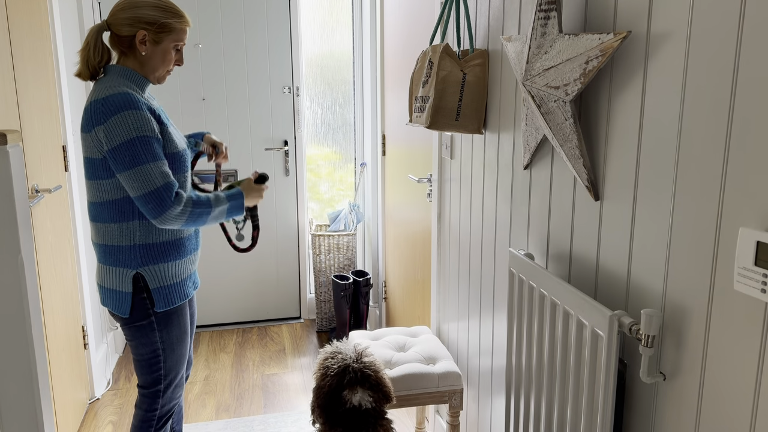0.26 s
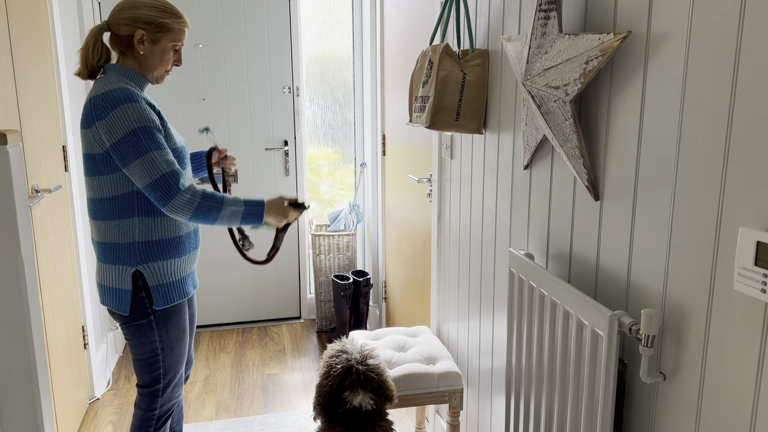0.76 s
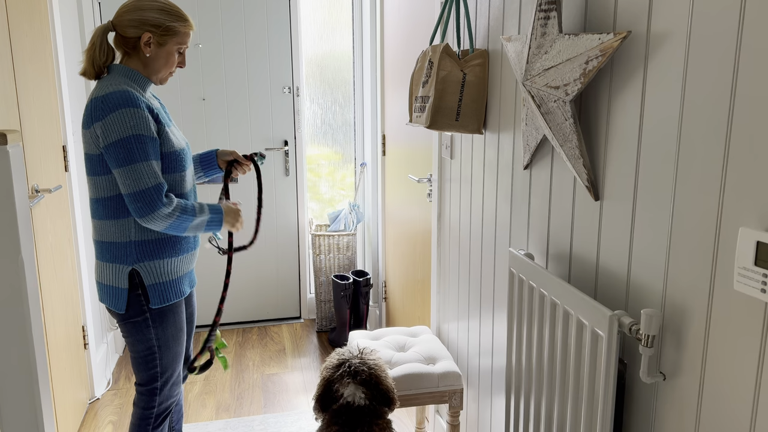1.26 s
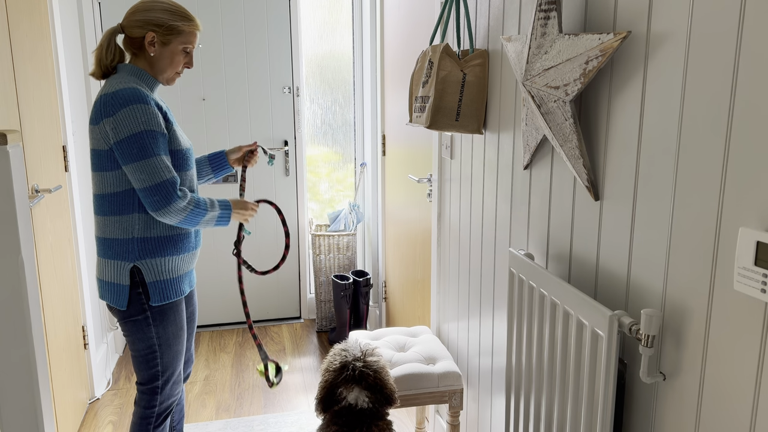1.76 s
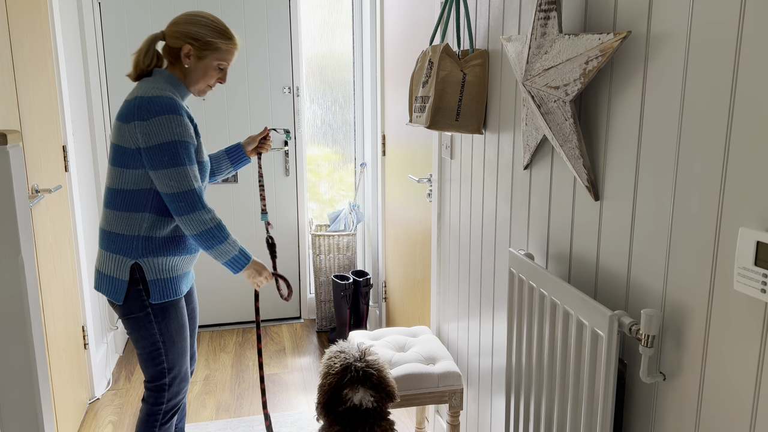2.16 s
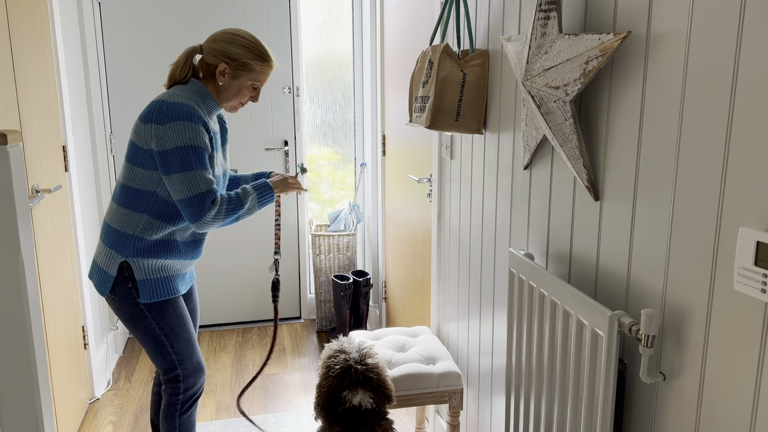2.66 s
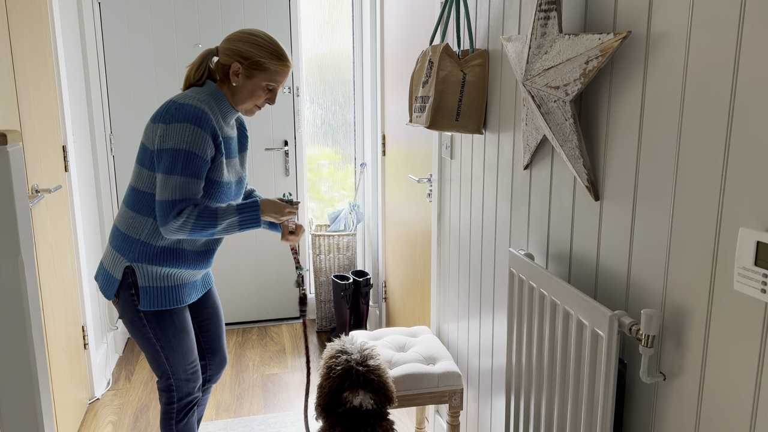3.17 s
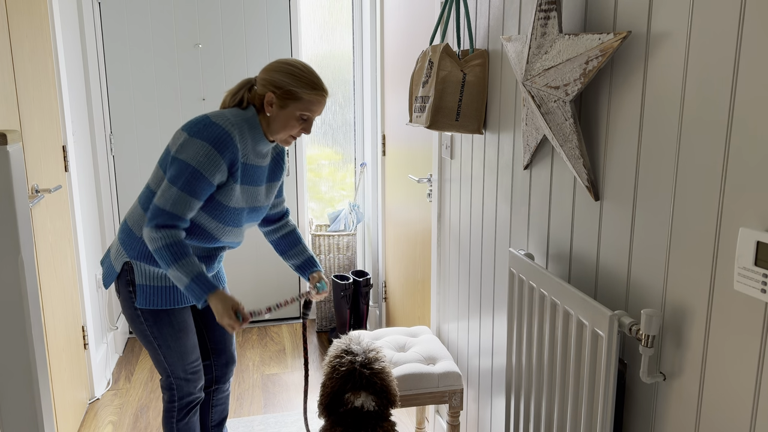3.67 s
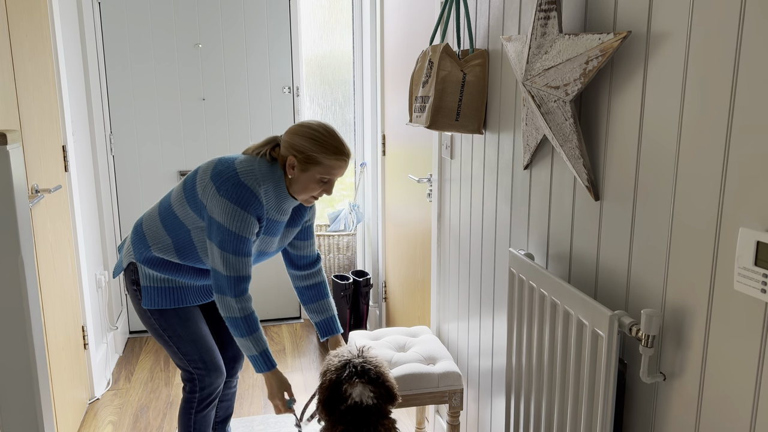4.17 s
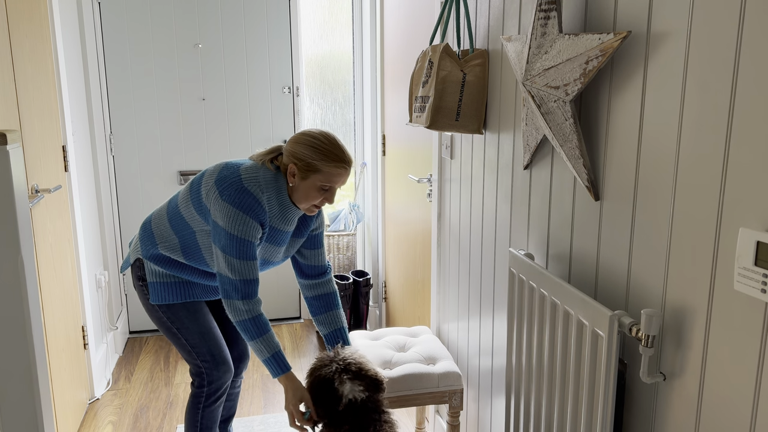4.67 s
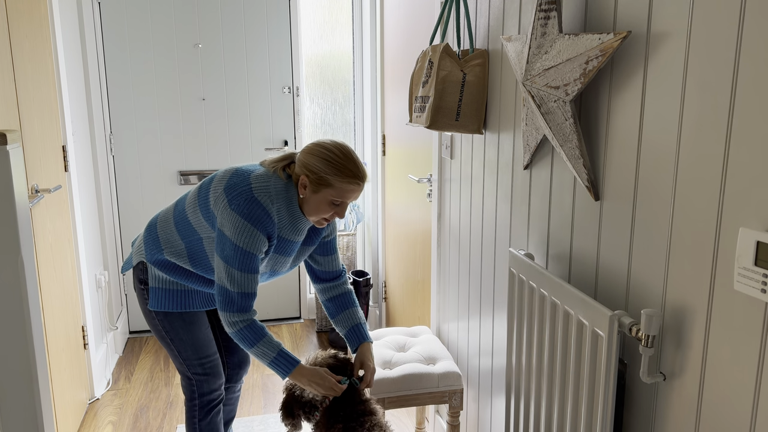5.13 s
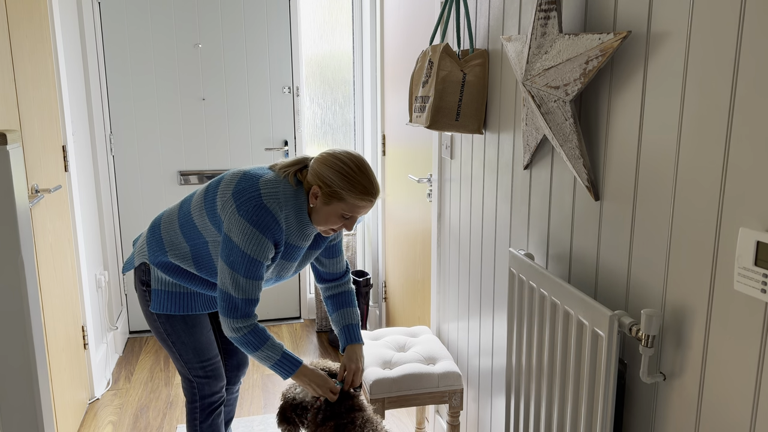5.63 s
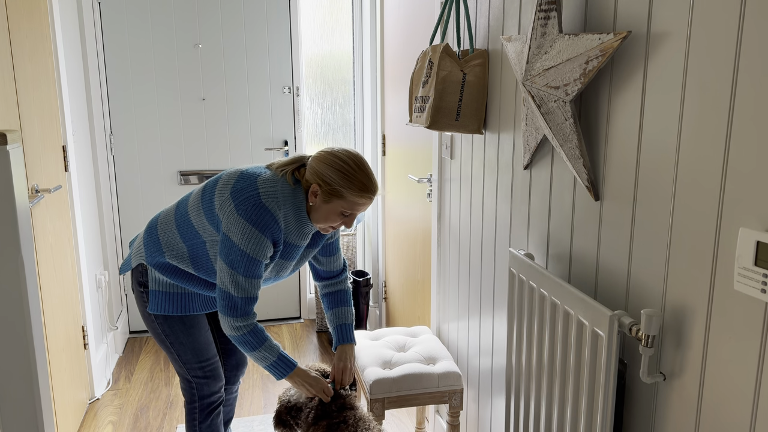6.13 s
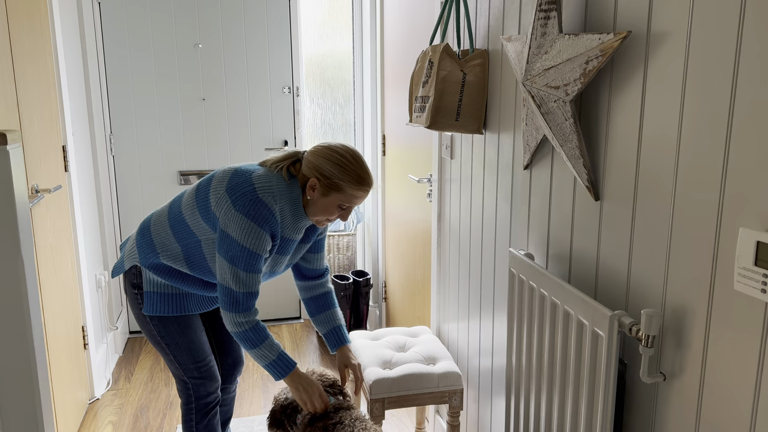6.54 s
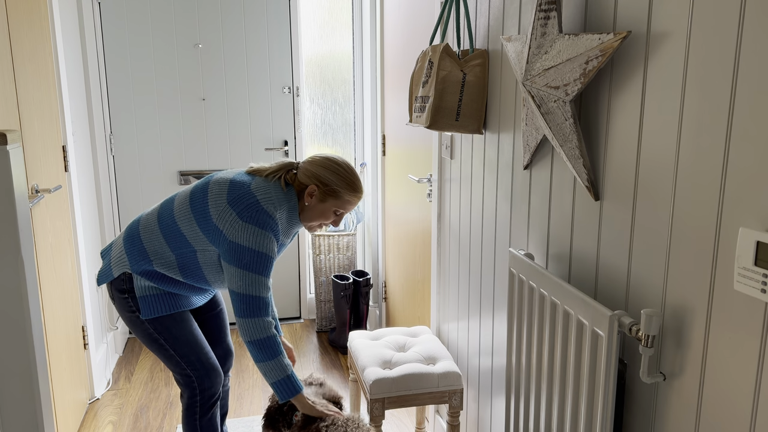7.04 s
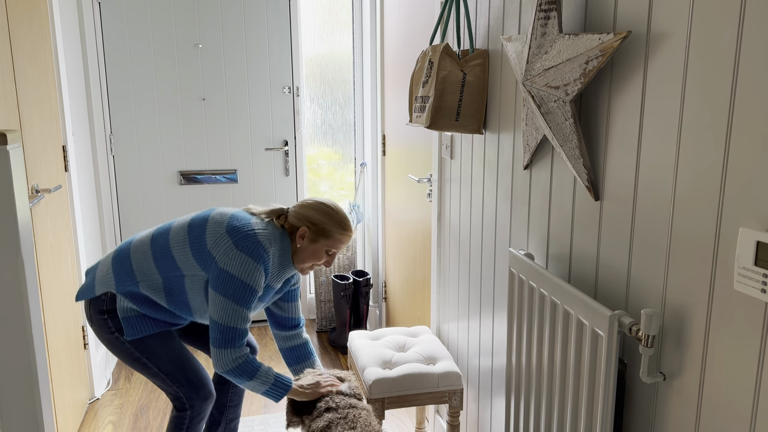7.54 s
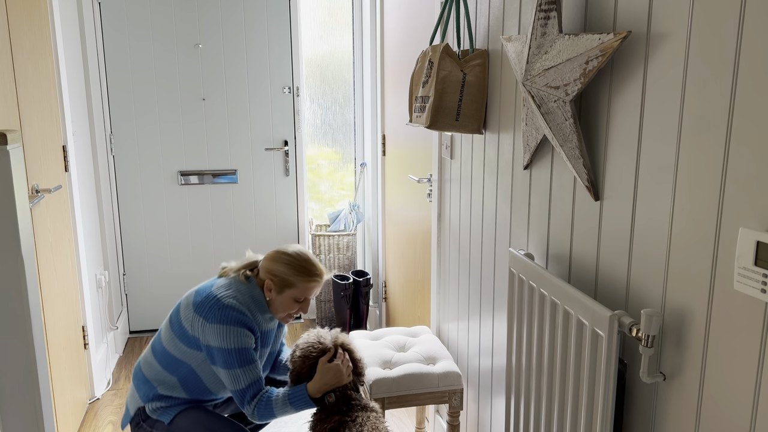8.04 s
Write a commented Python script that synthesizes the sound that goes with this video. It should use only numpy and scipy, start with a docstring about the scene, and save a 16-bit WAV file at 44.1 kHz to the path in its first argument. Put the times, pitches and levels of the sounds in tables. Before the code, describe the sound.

In a small, hard-walled hallway, a dog lead is handled: its metal clip and ring give bright, irregular clinks over the rustle of straps and sleeves, with a couple of brief squeaks. The handle drops on the wooden floor with a few soft thuds. More jingling follows, then a plastic harness buckle snaps shut, and some lighter clinks trail off. The microphone is a few steps away, over quiet house tone.

```python
"""Straps and sleeves rustle over a quiet house tone while a dog lead's spring clip and steel ring clink.
A strap slider taps, the handle drops on the wooden floor, and a harness buckle snaps shut. Each impact
is a broadband click and the free vibration of damped modes; friction gives noise. A small multi-port
microphone a few steps away hears it mostly through the reverberation of a small, hard hallway."""
import sys
import numpy as np
from scipy import signal
from scipy.io import wavfile

SR = 44100
rng = np.random.default_rng(int(sys.argv[2]) if len(sys.argv) > 2 else 0)


def transcribe(u):
    """Save the signal u as a 16-bit wav file named by the first command-line argument.

    u: samples, shape (n,) or (channels, n), limited to [-1, 1]; the rate is SR.
    q: integer samples, one column per channel.
    """
    v = np.clip(np.atleast_2d(u).T, -1, 1)
    q = np.round(v * 32767).astype(np.int16)
    wavfile.write(sys.argv[1], SR, q)


N = 366016
STEP = 40   # samples per value of a slow envelope

# movement: t/s, rustle level/dB, its tilt/(dB/octave), floor rumble level/dB
MOVES = [(0.0, -58.5, 2, -62.5), (0.41, -51, 0, -66.5), (0.97, -63.5, -0.5, -71.5), (1.15, -68, 0, -72),
         (1.4, -59, -1, -67.5), (2.12, -69, -3, -66), (2.59, -66.5, -2, -71.5), (3.211, -58.5, 1, -70),
         (3.629, -68, -0.5, -66), (5.48, -75, -3, -81), (6.898, -72, 0, -75.5), (7.1, -63.5, -3, -69.5),
         (7.65, -59.5, -1.5, -68.5), (8.3, -65.5, -0.5, -75)]
# clip meets ring: t/s, click level/dB, its tilt/(dB/octave), clip level/dB, ring level/dB,
CLINKS = [(.047, -72, 8, -57, -58, 5), (.105, -81, 17, -70, -58, 0), (0.136, -59.5, 13, -32, -64, 9),
          (.158, -63, 16, -36, -66, 5), (.204, -61, 16.5, -33.5, -54, 4.5), (0.226, -69, -12, -34, -75, -3),
          (0.3653, -65, 12.5, -47, -75, 10), (.524, -67, 4, -70, -57, 0), (.5454, -77, -1, -63, -59, -5),
          (.663, -71, 2, -67, -71, -6), (0.929, -70.5, 2, -70, -55.5, 0), (1.323, -74, 12, -47, -40.5, -10),
          (1.3803, -61, 14.5, -38, -46, -7), (1.499, -74.5, 9, -63, -51.5, -5),
          (1.6325, -74, 9, -45, -67, -3), (1.6531, -57, 8.5, -35, -37, 0.5),
          (1.728, -69.5, 14.5, -70, -42.5, 0), (1.962, -69.5, 7.5, -50.5, -46, 3.5),
          (2.8425, -56.5, 4, -36, -45.5, -7), (3.175, -56, 3, -31.5, -36.5, -12),
          (3.212, -52.5, 6.5, -34.5, -44.5, 4), (3.3482, -58, 3.5, -48, -76, 15),
          (3.387, -56.5, 2.5, -33, -58, -1), (3.4953, -63, 11, -48, -43.5, 11),
          (3.5619, -55, 5.5, -33.5, -31.5, -0.5), (4.1632, -67.5, 1.5, -77, -65, 0),
          (4.337, -72, 6.5, -65, -66, -10), (4.4036, -73.5, 3.5, -55, -70, -3),
          (4.9932, -70, -0.5, -73, -61, 8), (5.031, -55.5, 1.5, -53, -50, 9),
          (6.39, -74.5, 12, -53, -58, 8), (6.427, -78, 3, -45, -69, -4), (6.4428, -58, 2, -37.5, -73, -2),
          (6.4784, -62, 2, -33.5, -70, 2), (6.624, -67, 9, -45.5, -58, 3), (7.3894, -89, -2.5, -77, -72, 0),
          (7.615, -69.5, 1, -59, -63, 0), (8.275, -77, 8, -84, -57, -14)]
# impacts on the floor: t/s, level/dB, tilt/(dB/octave)
DROPS = [(2.034, -31.5, 4.5), (2.109, -45.5, 10), (2.258, -45, -6.5), (2.942, -30.5, -2),
         (3.105, -36, -1.5), (6.052, -56.5, -10.5)]
# buckle snaps: t/s, level/dB
SNAPS = [(5.8395, -54), (6.0546, -25)]


def from_db(db):
    """Amplitude ratio of a level."""
    return 10 ** (np.asarray(db) / 20)


def at_hz(points, hz):
    """Interpolation on a logarithmic frequency axis."""
    freqs, values = np.transpose(points)
    return np.interp(np.log(hz), np.log(freqs), values)


def drift(rate_hz):
    """Low-pass random fluctuation of unit variance, one value per STEP."""
    r = np.exp(-2 * np.pi * rate_hz * STEP / SR)
    slow = signal.lfilter([1], [1, -2 * r, r * r], rng.standard_normal(N // STEP + 2001))[2000:]
    return slow / slow.std()


def impulses(times, db):
    """Brief impacts idealised as one impulse each."""
    out = np.zeros(N)
    np.add.at(out, np.round(np.asarray(times) * SR).astype(int), from_db(db))
    return out


def decay(hits, t60):
    """Exponential decay: each impulse's energy spread into a power envelope."""
    r = from_db(-120 / (t60 * SR))
    return signal.lfilter([1 - r], [1, -r], hits ** 2 + 1e-24)


def reverberation(hits, hz):
    """Reverberant power: reflections build up, the early ones die fast, the late ones slowly."""
    hall = [(60, 0.3), (300, 0.48), (2000, 0.38), (6000, 0.49), (14000, 0.25)]   # reverberation time: f/Hz, T60/s
    build_up_s, early_share = 0.0033, 0.28
    power = early_share * decay(hits, t60=0.19) + (1 - early_share) * decay(hits, at_hz(hall, hz))
    r = np.exp(-1 / (build_up_s * SR))
    return signal.lfilter([1 - r], [1, -r], power)


def at_ports(white, hz):
    """Partial coherence: the two ports receive the sum and difference of two independent noises."""
    coherence = [(60, 0.94), (125, 1), (250, 0.76), (900, 0.19), (2000, 0.69), (4000, 0.12), (7000, 0.075)]   # f/Hz, left-right correlation
    balance = [(60, 0.5), (300, 1), (2500, 2.5), (3500, 5), (7000, 5), (8000, -5.5)]   # f/Hz, left over right level/dB
    alike = at_hz(coherence, hz)
    common, opposed = np.sqrt(1 + alike), np.sqrt(1 - alike)
    gains = from_db(at_hz(balance, hz) * np.array([[.5], [-.5]]) - 4)
    return (gains * np.array([[common, opposed], [common, -opposed]])) @ white


def resonance(noise, hz, width_hz):
    """Forced response of one resonator, scaled to unit rms."""
    r = np.exp(-np.pi * width_hz / SR)
    out = signal.lfilter([1, 0, -1], [1, -2 * r * np.cos(2 * np.pi * hz / SR), r * r], noise)
    return out / out.std()


def struck(times, db, modes_hz, modes_db, white, t60, echo_db, spread_db=2.0):
    """Modal superposition: damped modes driven by blows of uneven strength and by their echo."""
    out = 0
    for hz, mode_db in zip(modes_hz, modes_db):
        hits = impulses(times, db + mode_db + spread_db * rng.standard_normal(len(times)))
        echo = from_db(echo_db) * np.sqrt(reverberation(hits, hz)) * at_ports(white, hz)
        r, w = from_db(-60 / (t60 * SR)), 2 * np.pi * hz / SR
        out = out + signal.lfilter([0, np.sin(w)], [1, -2 * r * np.cos(w), r * r], hits + echo)
    return out


def movement(hz, grain_db):
    """Power at hz of cloth friction and floor rumble; as incoherent sources, they add in power."""
    cloth = [(150, -8), (500, -8), (1500, -4.5), (4000, -9), (7500, -10.5), (10500, -10.5), (14200, -8),
             (16000, -27)]   # spectrum: f/Hz, density level/dB
    floor = [(35, -27), (70, 1.5), (130, -5), (250, -10), (500, -62)]   # spectrum: f/Hz, density level/dB
    times, *columns = np.transpose(MOVES)
    t = np.arange(0, N + 1, STEP) / SR
    rustle_db, tilt, rumble_db = [np.interp(t, times, column) for column in columns]
    colour_db = at_hz(cloth, hz) + tilt * np.log2(hz / 2000)
    rustle = from_db(rustle_db + grain_db + 1.5 * drift(12) + colour_db + 6.5)
    rumble = from_db(rumble_db + at_hz(floor, hz) + 26)
    return rustle ** 2 + rumble ** 2


def house_tone(hz):
    """Power at hz of the ambient noise, its level wavering slightly."""
    spectrum = [(30, -4), (50, 21.5), (100, 5), (200, 3), (500, -8.5), (1000, -16.5), (1600, -9),
                (4000, -16), (8000, -34), (11000, -29), (16000, -33)]   # f/Hz, density level/dB
    return from_db(-55.5 + at_hz(spectrum, hz) + drift(11)) ** 2


def hum():
    """Narrow-band noise, heard as a faint low pitch."""
    return from_db(-73.5) * resonance(rng.standard_normal(N), hz=40, width_hz=1.7)


def contact_clicks(hz):
    """Power at hz of the clicks and their echo: a short contact has a broad spectrum."""
    ticks = [(0.392, -57, 7.5), (0.7945, -65.5, -8.5), (1.234, -54.5, -3), (2.012, -68.5, -7.5),
             (2.11, -69.5, -7.5), (2.9378, -61.5, -12.5), (3.8954, -85, 8), (5.442, -72.5, -5.5),
             (5.998, -76, 1), (8.072, -67, -5.5)]   # strap, plastic and floor: t/s, level/dB, tilt/(dB/octave)
    spectrum = [(300, -13.5), (1000, 3.5), (2500, 2), (3500, 6.5), (6200, 9), (8000, 0.5), (11000, 1),
                (14200, -2.5), (16000, -1.5)]   # f/Hz, density level/dB
    clinks = [row[:3] for row in CLINKS]
    snaps = [(t, db - 12.5, 5.4) for t, db in SNAPS]   # same columns as ticks
    times, db, tilt = np.transpose(clinks + ticks + snaps)
    octaves = np.log2(np.clip(hz, 1800, 11000) / 4400)
    hits = impulses(times, db + tilt * octaves + at_hz(spectrum, hz) + 29.5)
    return decay(hits, t60=.005) + reverberation(from_db(6.5) * hits, hz)


def spring_clip(white):
    """Inharmonic modes of the struck clip; the grip sets the strength of the low ones."""
    low_hz = [2760, 3590, 5180, 5290, 7060]   # low modes: f/Hz
    low_db = [-31, -30, -21.5, -34, -16.5]   # level/dB
    high_hz = [9700, 12200, 13550, 14430, 15390]   # high modes: f/Hz
    high_db = [-20, -30, -19, -9.5, -24]   # level/dB
    times, _, _, db, _, grip_db = np.transpose(CLINKS)
    low = struck(times, db + grip_db, low_hz, low_db, white, t60=.065, echo_db=12.8, spread_db=1.5)
    return low + struck(times, db, high_hz, high_db, white, t60=.065, echo_db=12.0)


def steel_ring(white):
    """Free vibration of the ring, damped by the hand; its close upper modes beat."""
    modes_hz = [7010, 13900, 14030, 14180, 14330]   # f/Hz
    modes_db = [-7.5, -32.5, 5.5, -15, -10.5]   # level/dB
    times, _, _, _, db, _ = np.transpose(CLINKS)
    return struck(times, db, modes_hz, modes_db, white, t60=.07, echo_db=5.2)


def strap_slider(white):
    """Impulse response of the slider: each tap rings its modes briefly."""
    taps = [(0.06, -60), (0.22, -49.5), (0.394, -50.5), (.546, -60), (1.382, -84), (1.726, -64),
            (2.845, -52), (3.213, -60)]   # t/s, level/dB
    modes_hz = [2910, 3350, 5730, 7300, 8050, 10780]   # f/Hz
    modes_db = [-7, -6.5, -4, 6.5, -0.5, -8.5]   # level/dB
    return struck(*np.transpose(taps), modes_hz, modes_db, white, t60=.04, echo_db=13.7)


def rubs():
    """Friction drives a resonance that swells and fades: rubs, squeaks, a foot pressing the boards."""
    strokes = [(0.243, 0.11, 990, 150, -56), (1.166, 0.089, 1040, 129, -55.5), (3.564, .34, 72, 44, -64.5),
               (3.949, 0.82, 1193, 89, -77.5), (3.95, 0.86, 1565, 108, -77.5),
               (4.907, .1, 3150, 1510, -67.5), (7.168, 0.07, 1190, 350, -65.5),
               (7.188, 0.07, 1810, 348, -66)]   # t/s, duration/s, f/Hz, bandwidth/Hz, level/dB
    out = np.zeros((2, N))
    for t, duration, hz, width_hz, db in strokes:
        start, size = int(t * SR), int(duration * SR)
        friction = at_ports(rng.standard_normal((2, SR)), hz)
        swell = from_db(db) * np.sin(np.linspace(0, np.pi, size))
        out[:, start:start + size] += swell * resonance(friction, hz, width_hz)[:, -size:]
    return out


def floor_thuds(hz):
    """Power at hz of the impact noise on the wooden floor, with its echo."""
    spectrum = [(29, -26), (50, -22), (171, 8), (237, 1.5), (270, 0.5), (546, -1), (1020, -27.5),
                (2500, -77), (3250, -56), (5500, -120)]   # f/Hz, density level/dB
    times, db, tilt = np.transpose(DROPS)
    hits = impulses(times, db + at_hz(spectrum, hz) + tilt * np.log2(hz / 300) + 37.0)
    return decay(hits, t60=0.025) + reverberation(from_db(4.5) * hits, hz)


def floorboards(white):
    """Each drop excites the low modes of the boards, damped under the mat."""
    modes_hz = [110, 183, 345, 460, 545]   # f/Hz
    modes_db = [-25, -14.5, -10, -14, -32]   # level/dB
    times, db, _ = np.transpose(DROPS)
    return struck(times, db, modes_hz, modes_db, white, t60=.12, echo_db=1.3)


def buckle(white):
    """Heavy damping: the plastic buckle's modes die within milliseconds of a snap."""
    modes_hz = [3300, 4600, 6200, 10900, 14300]   # f/Hz
    modes_db = [-39, -13, 2, -13, 4.5]   # level/dB
    return struck(*np.transpose(SNAPS), modes_hz, modes_db, white, t60=.007, echo_db=3.0, spread_db=4.5)


def broadband_noise():
    """Incoherent addition: in each band, the sources' summed power sets the envelope of a noise."""
    grain_db = drift(19)   # cloth rubs in small uneven catches
    edges_hz = np.concatenate([np.geomspace(35, 4000, 16), np.arange(5200, 17500, 1500)])
    white = rng.standard_normal((2, 2, N))   # adjacent bands take independent noises
    out = 0
    for k, (low, high) in enumerate(zip(edges_hz, edges_hz[1:])):
        hz = np.sqrt(low * high)
        sustained = np.repeat(movement(hz, grain_db) + house_tone(hz), STEP)[:N]
        power = sustained + contact_clicks(hz) + floor_thuds(hz)
        band = signal.butter(2, [low, high], "band", fs=SR, output="sos")
        out = out + signal.sosfilt(band, np.sqrt(power) * at_ports(white[k % 2], hz))
    return out


def scene():
    """Superposition of all sources at the two ports."""
    white = rng.standard_normal((2, N))   # carries the echo of every struck body
    hardware = spring_clip(white) + steel_ring(white) + strap_slider(white) + buckle(white)
    return hardware + floorboards(white) + hum() + broadband_noise() + rubs()


def record(dry):
    """Crossover: one port gives nearly all the treble, late and inverted on the left; then a band limit."""
    crossover_hz, low_cut_hz, stopband_hz = 7900, 40, 16700
    port_lag, right_lag = 14, 2   # samples
    left_low, right_low = signal.sosfilt(signal.butter(8, crossover_hz, fs=SR, output="sos"), dry)
    leak, treble = signal.sosfilt(signal.butter(8, crossover_hz, "high", fs=SR, output="sos"), dry)
    late_treble = np.concatenate([np.zeros(port_lag), treble[:-port_lag]])
    left = left_low + from_db(-29.0) * leak - late_treble
    right = np.roll(right_low, right_lag) + treble
    mixed = signal.sosfilt(signal.butter(4, low_cut_hz, "high", fs=SR, output="sos"), [left, right])
    return signal.sosfilt(signal.cheby2(12, 60, stopband_hz, fs=SR, output="sos"), mixed)


dry = scene()
out = record(dry)
transcribe(out)
```